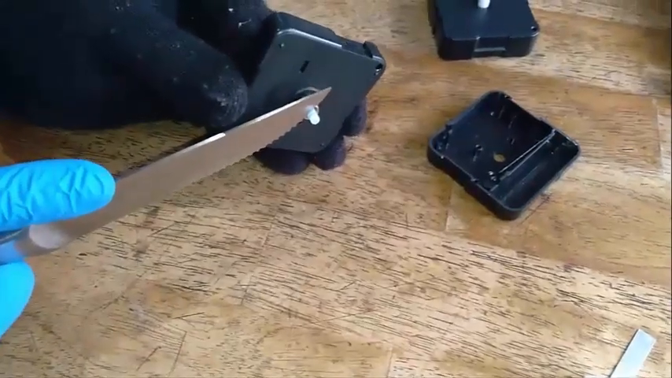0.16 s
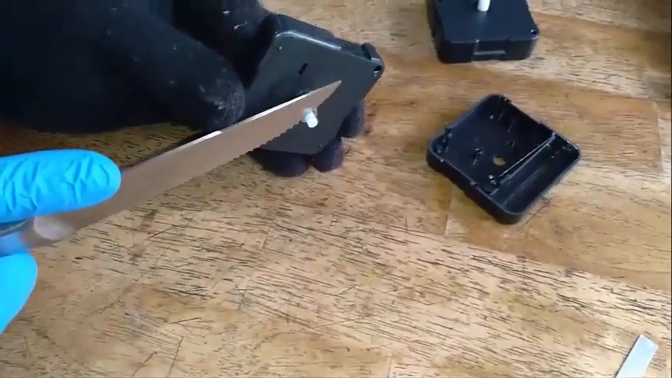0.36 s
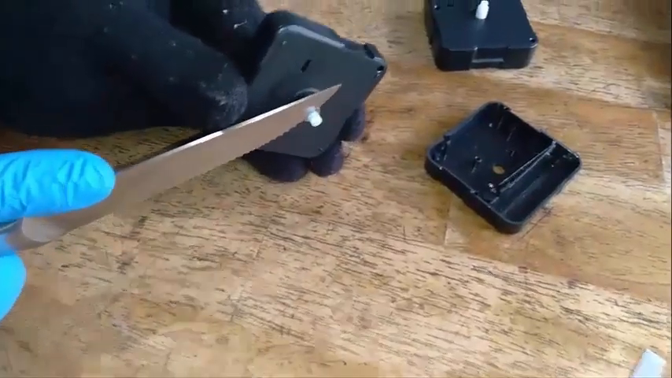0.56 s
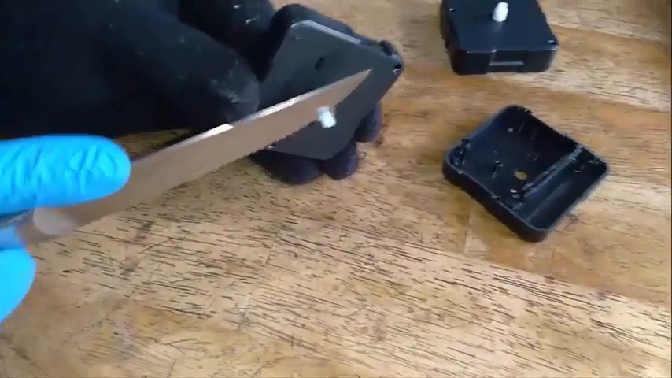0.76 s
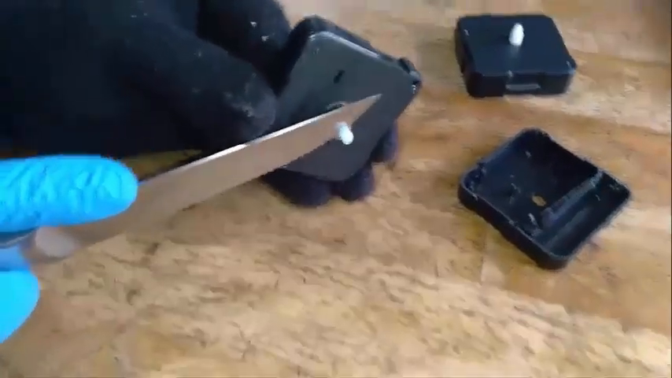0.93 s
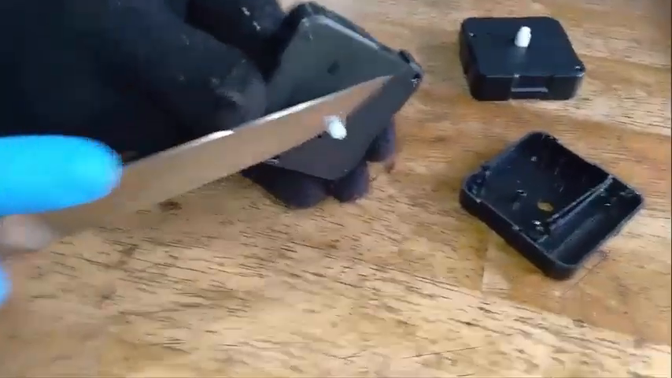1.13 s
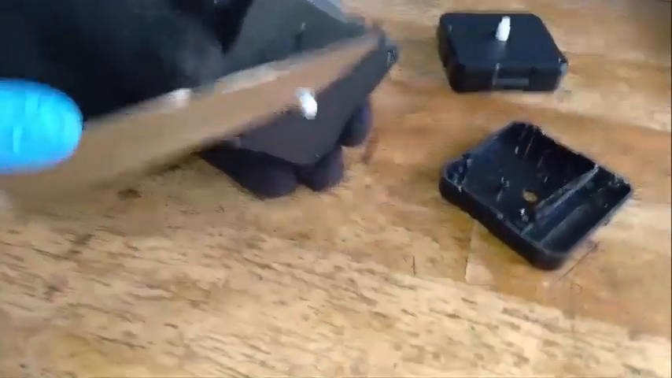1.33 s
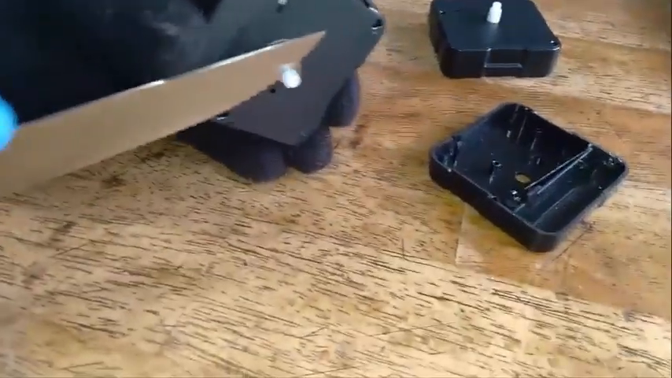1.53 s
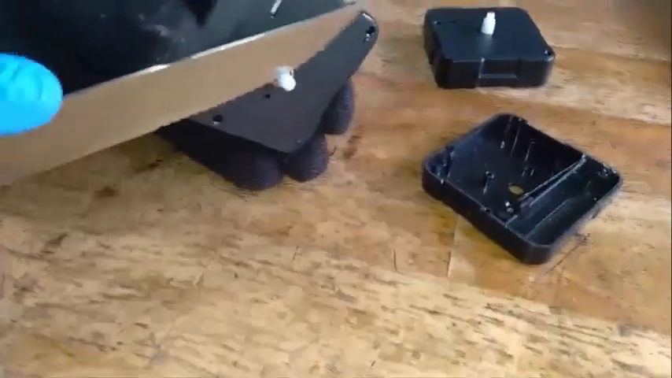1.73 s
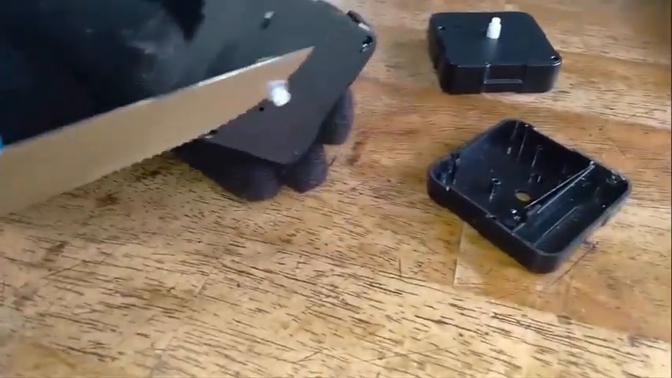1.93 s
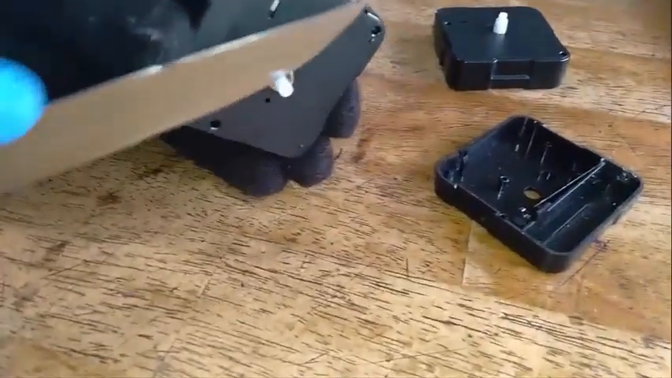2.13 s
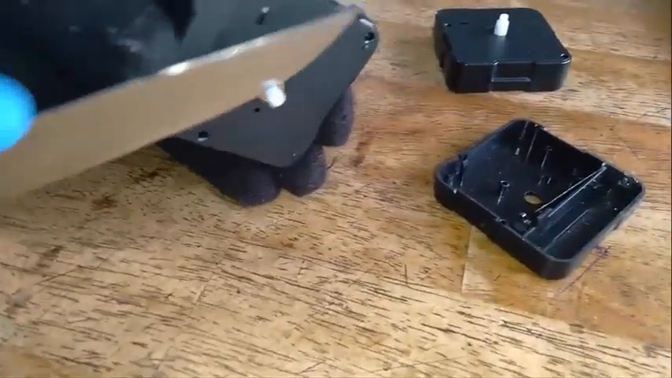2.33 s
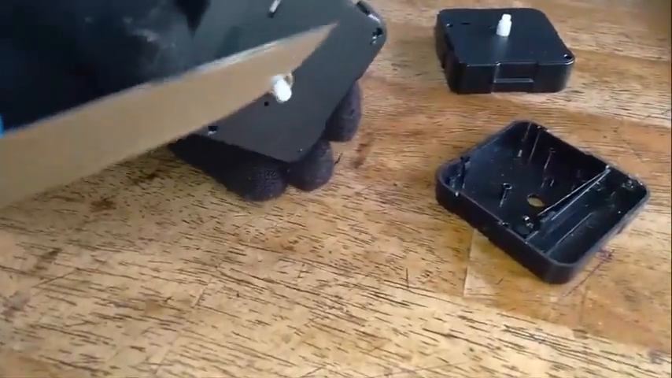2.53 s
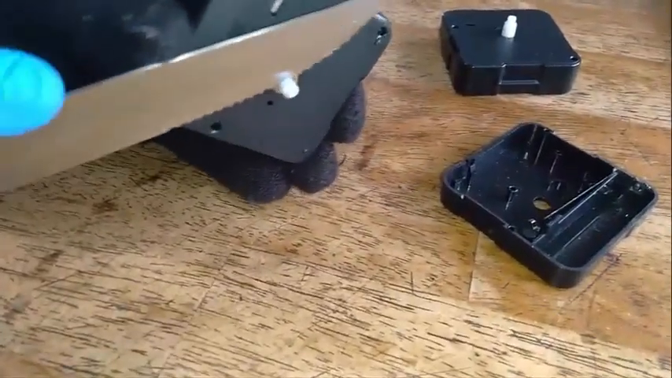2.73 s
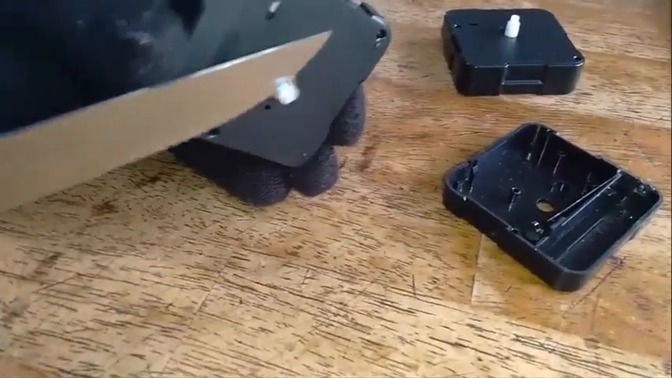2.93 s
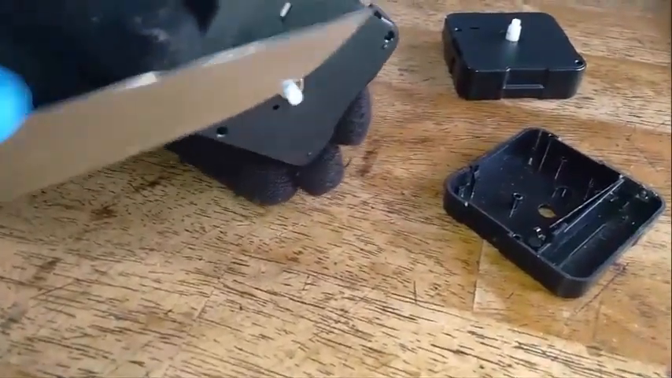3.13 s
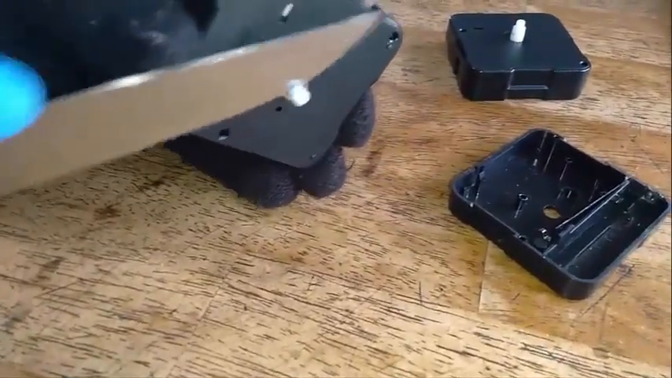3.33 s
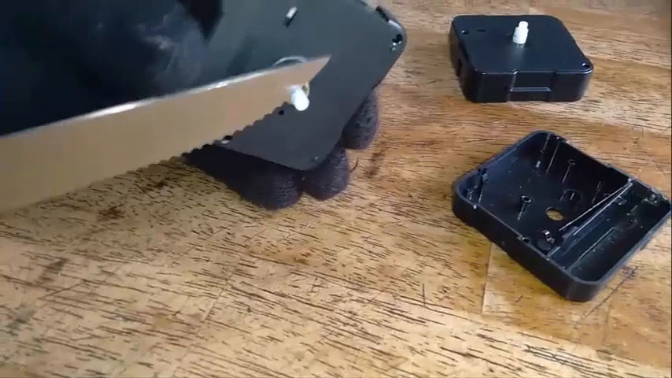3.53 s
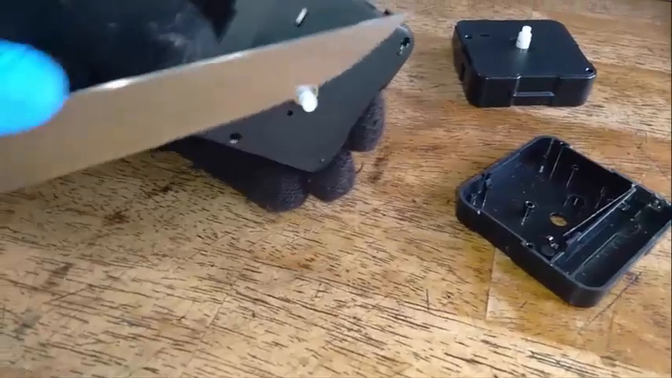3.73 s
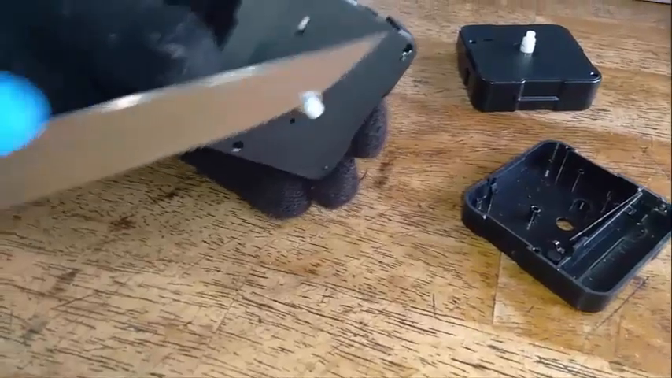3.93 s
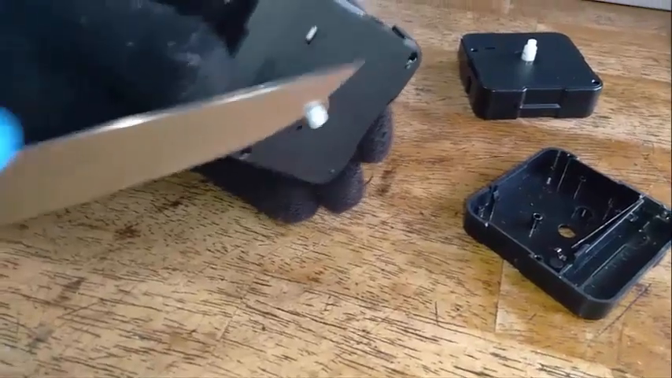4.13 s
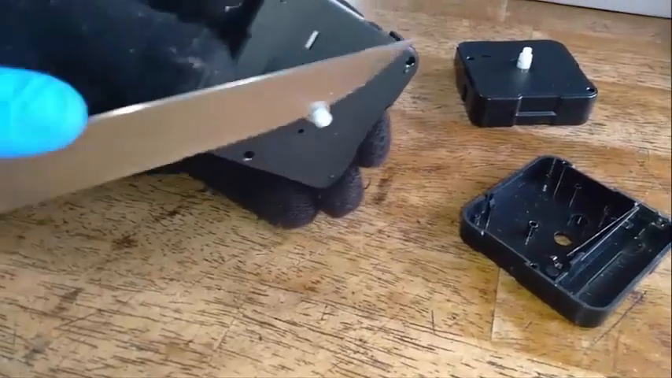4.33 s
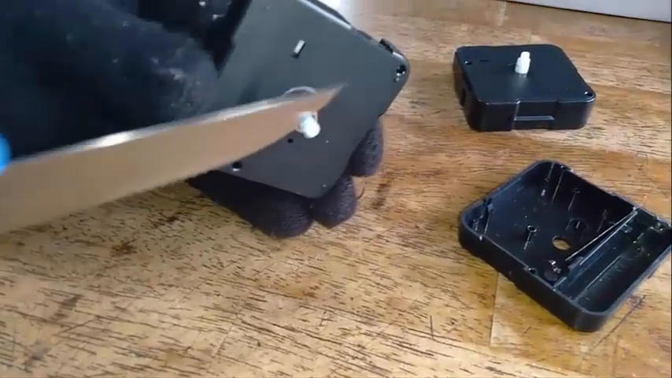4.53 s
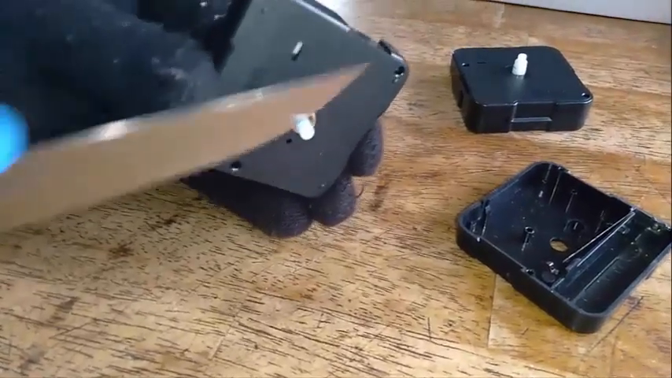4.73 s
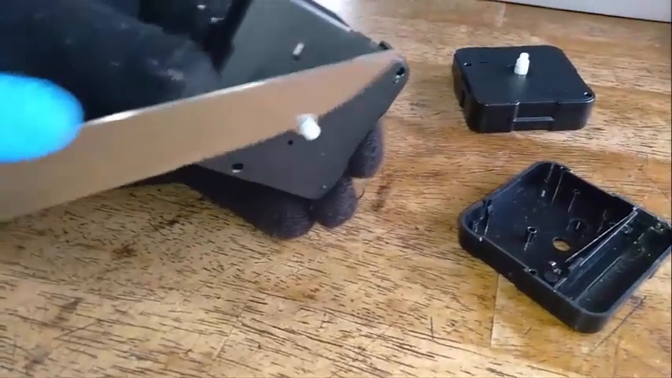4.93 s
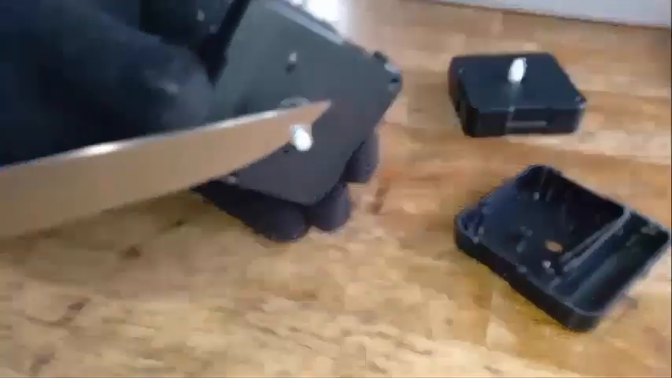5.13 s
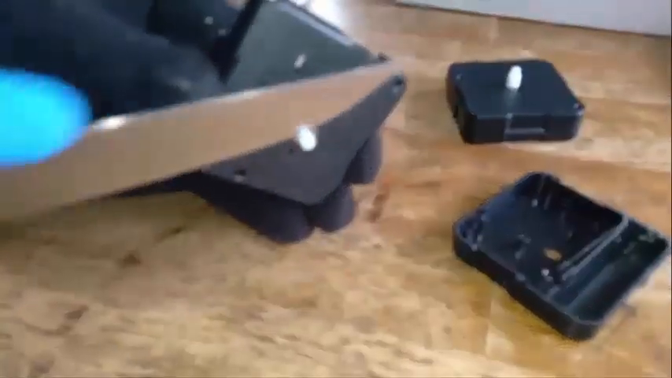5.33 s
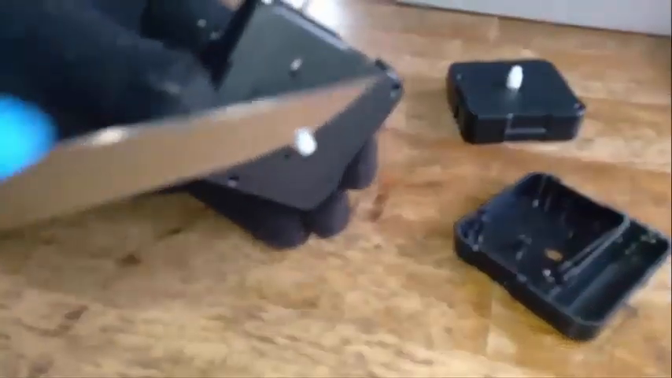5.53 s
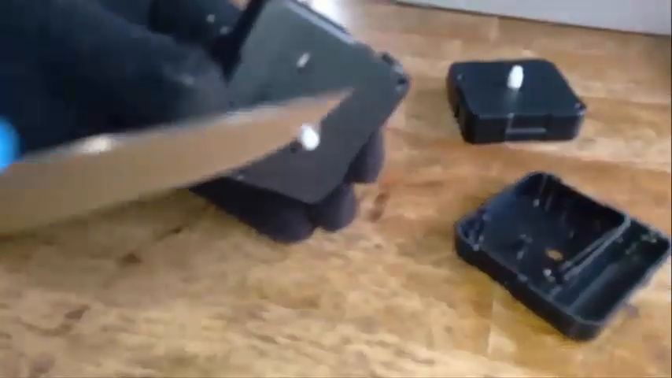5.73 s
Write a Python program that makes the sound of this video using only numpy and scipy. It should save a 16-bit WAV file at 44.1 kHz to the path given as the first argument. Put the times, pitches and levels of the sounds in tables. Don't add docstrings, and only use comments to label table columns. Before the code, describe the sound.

Close stereo pickup in a small indoor room. After near silence with tiny glove ticks, a serrated knife begins sawing a thin plastic shaft. Short runs of separate tooth clicks alternate, louder going out and weaker, raspier coming back, about three full cycles per second. The steel rings brightly, the hollow plastic case knocks dully, and strokes strengthen until the end.

```python
import sys
import numpy as np
from scipy import signal
from scipy.fft import rfft, irfft
from scipy.io import wavfile
from scipy.ndimage import uniform_filter1d, minimum_filter1d

SR = 44100
rng = np.random.default_rng(int(sys.argv[2]) if len(sys.argv) > 2 else 0)


def wrap_up_sound(samples):
    columns = np.atleast_2d(samples).T
    tamed = np.clip(columns, -1, 1)
    steps = np.round(tamed * 32767).astype(np.int16)
    wavfile.write(sys.argv[1], SR, steps)


def nominal_scale(level):
    x = np.asarray(level, float) / 20
    return 10 ** x


N = 254898


def unit(x):
    return x / np.sqrt(np.mean(x ** 2) + 1e-20)


def along(points, hz):
    point_hz, value = np.transpose(points)
    return np.interp(np.log(hz + 1), np.log(point_hz + 1), value)


def level(rows):
    time_s, level_db = np.transpose(rows)
    return nominal_scale(np.interp(np.arange(N) / SR, time_s, level_db))


def coloured(x, spectrum):
    points = [(1, -90)] + list(spectrum) + [(SR / 2, -90)]
    gain = nominal_scale(along(points, np.fft.rfftfreq(4096, 1 / SR)))
    cepstrum = irfft(np.log(gain))
    cepstrum[1:2048] *= 2
    cepstrum[2049:] = 0
    pulse = irfft(np.exp(rfft(cepstrum)))
    pulse = pulse / np.linalg.norm(pulse)
    return signal.fftconvolve(x, pulse[None], axes=1)[:, :N]


def grit(alike, spiky_db, lag=10):
    shared, left, right = rng.standard_normal((3, N))
    grains = nominal_scale(spiky_db * unit(uniform_filter1d(rng.standard_normal(N), size=24)))
    mix = np.clip(alike, 0, 1)
    common = np.array([shared, np.roll(shared, -int(lag))])
    own = np.array([left, right])
    return unit((np.sqrt(mix) * common + np.sqrt(1 - mix) * own) * grains)


def patches(shape, bins, frames):
    field = uniform_filter1d(rng.standard_normal(shape), size=bins, axis=0)
    return unit(uniform_filter1d(field, size=frames, axis=1))


def mottled(x, depth_db, frames):
    z = signal.stft(x, SR, nperseg=256)[2]
    field = patches(z.shape[1:], bins=6, frames=frames)
    return signal.istft(z * nominal_scale(depth_db * field), SR, nperseg=256)[1][:, :N]


# multiple, level_db
DRONE_HARMONICS = [(1, -17), (2, 2), (3, -3), (4, -4.5), (5, -3.5), (6, -4.5), (7, -12), (8, -3.5),
                   (9, -19), (10, -14), (11, -14), (12, -28), (13, -19), (14, -17.5)]
# freq_hz, density_db
AIR_SPECTRUM = [(300, -4), (700, 10), (3000, -17), (8200, -6), (10000, -17), (12000, -34)]


def background():
    drone_hz = 30.41
    t = np.arange(N) / SR
    phases = 2 * np.pi * rng.random(len(DRONE_HARMONICS))
    drone = np.zeros(N)
    for (multiple, level_db), phase in zip(DRONE_HARMONICS, phases):
        drone += nominal_scale(level_db) * np.sin(2 * np.pi * drone_hz * multiple * t + phase)
    air = coloured(rng.standard_normal((2, N)), AIR_SPECTRUM)
    return nominal_scale(-89.0) * drone + nominal_scale(-106) * air


# freq_hz, t60_s
ROOM_DECAY = [(200, 0.27), (8000, 0.15), (15000, 0.14)]


def room(x):
    wet, step, delay = np.zeros((2, N + SR)), SR // 6, 620
    for start in range(0, N, step):
        hz, t, z = signal.stft(rng.standard_normal((2, SR // 3)), SR, nperseg=256)
        decay = nominal_scale(-60 * t / along(ROOM_DECAY, hz)[:, None])
        tail = signal.istft(z * decay, SR, nperseg=256)[1]
        part = signal.fftconvolve(x[:, start:start + step], tail / np.linalg.norm(tail[0]), axes=1)
        wet[:, start + delay:][:, :part.shape[1]] += part
    return wet[:, :N]


# start_s, peak_db
GLOVE_TICKS = [
    (0.151, -74),
    (0.6174, -70),
]


def creaks():
    force, t = np.zeros(N), np.arange(300) / SR
    for start_s, peak_db in GLOVE_TICKS:
        force[round(start_s * SR):][:len(t)] = nominal_scale(peak_db - 5 - 60 * t / .012)
    return coloured(force * grit(0.46, 2.0), [(4500, -30), (8000, -13), (10500, -10), (12000, -34)])


# time_s, level_db
DRAG_LEVEL = [
    (1.2, -110),
    (1.28, -80),
    (1.31, -71),
    (1.35, -76),
    (1.4, -102),
    (1.46, -67),
    (1.5, -62.5),
    (1.54, -75),
    (1.62, -110),
]


def glove_drag():
    hum_spectrum = [(300, -17), (1270, -13.5), (1540, 3), (1910, -5), (5500, -19)]
    return coloured(level(DRAG_LEVEL) * grit(.4, 1.9), hum_spectrum)


# time_s, level_db
RUB_LEVEL = [(.39, -100), (.47, -100), (.51, -53), (.55, -69), (.8, -88), (.93, -58.5), (.97, -68.5),
             (1.17, -96), (1.195, -54), (1.3, -70), (1.44, -76), (1.53, -55), (1.62, -64.5), (1.87, -65),
             (2.19, -61), (3.6, -68), (4.14, -61.5), (5.78, -62.5)]
# freq_hz, density_db
RUB_SPECTRUM = [(150, -30), (600, -17), (1500, -16), (3000, -13), (4800, -6), (7800, -2), (10000, 0),
                (12000, -8), (16000, -14)]


def blade_rub():
    lift_db, lead_s = -11, 0.0097
    turns = [(run[0] - lead_s, lift_db) for run in PUSH_RUNS]
    turns += [(run[0] - lead_s, 0) for run in PULL_RUNS]
    return coloured(level(RUB_LEVEL) * level(sorted(turns)) * grit(0.021, 1.2), RUB_SPECTRUM)


def stroke(runs, counts, lone, contact_ms, rasp_db, rasp_per_db):
    first, last, first_db, last_db, slowing = np.repeat(runs, counts, axis=0).T
    u = np.concatenate([np.linspace(0, 1, n) for n in counts])
    ease = 0.11 * np.sin(2 * np.pi * u) / (2 * np.pi)
    s = first + (last - first) * (u + slowing * u * (u - 1) + ease)
    luck = rng.standard_normal((len(u) + len(lone), 3))
    bite = luck[:len(u), 0]
    arch_db = 1 * (np.sin(np.pi * u) - .4)
    db = first_db + (last_db - first_db) * u + 1.5 * bite + arch_db
    deepening = 0.065 * (s - 4.1)
    ms = np.interp(u, [0, .5, 1], contact_ms) * np.exp(deepening - 0.28 * bite + 0.17 * luck[:len(u), 1])
    s, db, ms = np.hstack([[s, db, ms], np.transpose(lone)])
    rasp_db = rasp_db - rasp_per_db * (db + 25.5)
    rasp_db = rasp_db + 2.27 * luck[:, 2] - 1.8 * np.pad(bite, (0, len(lone)))
    return np.array([s, db, ms, rasp_db]).T


# first_s, last_s, first_db, last_db, slowing (-1..1)
PUSH_RUNS = [(.412, .4487, -37.5, -35.5, 0), (0.685, 0.748, -29.5, -35.5, 0.43),
             (1.0317, 1.0674, -31, -35.5, -0.054), (1.3571, 1.3981, -31.5, -27.5, -0.41),
             (1.7074, 1.7597, -30.5, -27.5, 0.11), (2.053, 2.1075, -28, -22.5, -0.12),
             (2.386, 2.4603, -24, -26.5, 0.076), (2.73, 2.779, -25.5, -22.5, 0.037),
             (3.0644, 3.1071, -20, -27, 0.3), (3.3544, 3.4104, -21.5, -25.5, 0.059),
             (3.6828, 3.7448, -22.5, -26.5, 0.188), (4.007, 4.05, -20, -23, .03),
             (4.3227, 4.3693, -24, -22.5, 0.044), (4.6422, 4.701, -22.5, -24.5, 0.36),
             (4.9595, 5.0114, -23, -23.5, 0.03), (5.2695, 5.3253, -22, -23.5, -0.051),
             (5.591, 5.6618, -24, -23.5, 0.064)]
PUSH_COUNTS = [2, 3, 3, 3, 5, 5, 7, 5, 4, 5, 6, 5, 5, 6, 6, 7, 8]
# start_s, level_db, contact_ms
PUSH_LONE = [(0.5196, -59, 4.6), (0.529, -53, 6), (1.0994, -41.5, 11.4), (1.4407, -38, 1.5),
             (1.4435, -44.5, 8.9), (2.1382, -27, 3.6), (2.4908, -43, 3.3), (2.7972, -26.5, 3.8),
             (3.4318, -27.5, 3.4), (3.7618, -24, 4.7), (4.0689, -24, 5.8), (4.6258, -27, 3.5),
             (5.0297, -26, 3.3), (5.3394, -19, 2.8), (5.6819, -20.5, 2)]


def push_stroke():
    return stroke(PUSH_RUNS, PUSH_COUNTS, PUSH_LONE,
                  contact_ms=(2.5, 5, 4.5), rasp_db=-6.5, rasp_per_db=0.1377)


# first_s, last_s, first_db, last_db, slowing (-1..1)
PULL_RUNS = [(0.8572, 0.8787, -35, -38.5, 0), (1.1991, 1.2233, -34, -34.5, 0),
             (1.5274, 1.5792, -29, -31, 0.11), (1.8844, 1.93, -28, -31, -0.04),
             (2.222, 2.2704, -26.5, -30, 0.16), (2.545, 2.6059, -30, -30, 0.042),
             (2.882, 2.9373, -27, -27.5, -0.12), (3.2346, 3.259, -24, -29.5, 0.023),
             (3.529, 3.568, -33, -30.5, -0.046), (3.858, 3.895, -30, -32.5, 0.011),
             (4.1567, 4.2042, -30.5, -28, 0.021), (4.4751, 4.5113, -27.5, -30.5, -0.17),
             (4.7972, 4.855, -26.5, -32, 0.023), (5.1086, 5.121, -37, -35.5, 0),
             (5.1322, 5.153, -24.5, -30.5, -0.074), (5.4433, 5.4878, -26, -32, 0.095),
             (5.7603, 5.7718, -27, -27, 0)]
PULL_COUNTS = [2, 2, 4, 4, 4, 6, 5, 3, 4, 4, 5, 4, 6, 2, 3, 6, 2]
# start_s, level_db, contact_ms
PULL_LONE = [(.843, -45.5, 1.8), (.869, -50, 6.2), (.899, -47.5, 11), (1.208, -47, 12), (1.253, -46.5, 2.1),
             (1.602, -46, 4.4), (1.6093, -47, 3.3), (1.8531, -40.5, 1.5), (1.944, -45.5, 17.5),
             (1.996, -52, 1.2), (2.2, -45.5, 1.1), (2.2953, -41, 1.7), (2.3022, -48, 2.4),
             (2.526, -33.5, 5.2), (2.629, -43.5, 6.5), (2.958, -32, 2.2), (3.2201, -41, 6.3),
             (3.2707, -38, 8.9), (3.5804, -45.5, 14.6), (3.841, -35, 6.8), (4.2163, -38.5, 12.3),
             (4.448, -38.5, 1.8), (4.5207, -37, 15), (4.535, -40.5, 17), (5.1664, -33, 2.1),
             (5.4315, -35, 1.9), (5.5004, -34, 2.5)]
# start_s, level_db, contact_ms
GRAZES = [(.955, -67.5, 15), (1.2628, -54, 4.8), (2.8666, -63, 5.1), (3.3289, -51.5, 3), (3.606, -58.5, 12),
          (3.6404, -64, 2.3), (3.9164, -50.5, 11), (4.2826, -65, 3.7), (4.289, -68, 2.3),
          (4.9174, -61.5, 8), (5.1757, -51.5, 22), (5.511, -57, 12)]


def pull_stroke():
    return stroke(PULL_RUNS, PULL_COUNTS, PULL_LONE + GRAZES,
                  contact_ms=(2.5, 4, 4), rasp_db=-5.5, rasp_per_db=0.31)


def contacts(rows, db, rise_ms, fall_ms, creep_db=-23, snap_db=5.0):
    start_s, hold_ms = np.array(rows)[:, 0], np.array(rows)[:, 2, None]
    ms = np.arange(-420, 1000) * 1000 / SR
    bite = 1 / (1 + np.exp(-np.clip(ms / rise_ms, -50, 50)))
    creep = nominal_scale(creep_db) * np.exp(-(np.minimum(ms, 0) / 5.63) ** 2)
    sag_db = -6 * np.clip(ms / hold_ms, 0, 1)
    release_db = -9 * np.maximum(ms - 0.87 * hold_ms, 0) / fall_ms
    clear_db = -0.54 * np.maximum(ms - hold_ms - 5.5, 0) ** 2
    land_db = -1.1 * np.maximum(-ms - 4.5, 0) ** 2
    snap = nominal_scale(snap_db * (np.exp(-np.abs(ms - .3) / 0.53) - 0.32))
    shape = np.maximum(bite * snap, creep) * nominal_scale(sag_db + release_db + clear_db + land_db)
    shape = nominal_scale(db)[:, None] * shape
    where = np.round(start_s * SR).astype(int)[:, None] + np.arange(-400, 1020)
    return np.sqrt(np.bincount(where.ravel(), shape.ravel() ** 2, N + SR)[:N])


def ring(force, times, modes, scatter_db):
    luck = nominal_scale(scatter_db * rng.standard_normal((len(times), len(modes), 2)))
    tooth = np.clip(np.searchsorted(times - .001, np.arange(N) / SR) - 1, 0, None)
    out = np.zeros((2, N))
    for k, (hz, width_hz, db) in enumerate(modes):
        b, a = signal.iirpeak(hz, hz / width_hz, SR)
        mode = signal.lfilter(b, a, force * luck[tooth, k].T)
        out += nominal_scale(db) * mode * np.sqrt(SR / (np.pi * width_hz))
    return out


# freq_hz, density_db
KNOCK_SPECTRUM = [(15, -6), (30, -7), (350, -4), (800, -3.5), (1400, -6.5), (2400, -6.5)]


def case_knock(rows):
    s, db = rows[:, 0], rows[:, 1]
    knock_db = db - 22.5 + 0.5 * s + 1.1 * rng.standard_normal(len(s))
    return coloured(contacts(rows, knock_db, 0.15, 1.45) * grit(0.2, 1.9, lag=0), KNOCK_SPECTRUM)


# freq_hz, width_hz, level_db
CASE_MODES = [(632, 114, -24), (1030, 580, -16.5), (2140, 490, -17), (2860, 610, -18.5), (5340, 1140, -5),
              (5910, 400, -19.5), (6060, 640, -10.5)]


def case_ring(rows):
    s, db, _, rasp_db = rows.T
    force = contacts(rows, db + rasp_db - 4.0, 0.32, 2.65)
    return ring(force * grit(0.23, 1.5), np.sort(s), CASE_MODES, scatter_db=4.5)


# freq_hz, density_db
PUSH_RASP = [(900, -17), (1600, -6.5), (2150, -4.5), (3050, -5.5), (5800, 3), (7100, 2), (9000, -20)]
# freq_hz, density_db
PULL_RASP = [(900, -16.5), (1600, -7.5), (2150, -14), (3350, -10), (4200, -4.5), (4800, 2), (7300, -15.5),
             (9000, -20)]


def shaft_rasp(push, pull):
    out = np.zeros((2, N))
    for rows, spectrum in [(push, PUSH_RASP), (pull, PULL_RASP)]:
        _, db, _, rasp_db = rows.T
        out += coloured(contacts(rows, db + rasp_db - 6.5, 0.64, 6.1) * grit(0.1, 2.8), spectrum)
    return out


# freq_hz, width_hz, level_db
BLADE_MODES = [(8070, 280, -2), (8460, 190, -5.5), (8650, 140, -12), (9853, 280, -2.5), (10210, 530, -1.5),
               (10400, 750, -3.5), (12580, 330, -16.5), (14400, 290, -9)]


def blade_ring(rows):
    s, db = rows[:, 0], rows[:, 1]
    force = contacts(rows, db - 10.5, 0.019, 3.13)
    return ring(force * grit(.75, 2, lag=9), np.sort(s), BLADE_MODES, scatter_db=3)


# freq_hz, density_db
EDGE_SPECTRUM = [(5000, -5), (7500, 2), (10000, 4), (12000, 1.5), (15500, -4.5), (16500, 6.5)]


def edge_hiss(rows):
    return coloured(contacts(rows, rows[:, 1] - 4.5, 0.026, 4.5) * grit(0.089, 4.3), EDGE_SPECTRUM)


# time_s, left_over_right_db
PORT_BALANCE = [(.4, 1.5), (1.5, 1.3), (2.4, 0), (4.2, 1.2), (5.78, -.6)]


def teeth():
    push, pull = push_stroke(), pull_stroke()
    rows = np.vstack([push, pull])
    steel = edge_hiss(rows) + blade_ring(rows)
    plastic = shaft_rasp(push, pull) + case_ring(rows) + case_knock(rows)
    lean = np.sqrt(level(PORT_BALANCE))
    return (steel + plastic * nominal_scale([[.9], [-.9]])) * [lean, 1 / lean]


def scene():
    knife = mottled(teeth(), depth_db=2.5, frames=3)
    haze = nominal_scale(-20.5) * room(knife) + blade_rub() + glove_drag()
    return knife + mottled(haze, depth_db=3.0, frames=14) + creaks() + background()


def masked(x, margin_db, faint_db):
    hz, _, z = signal.stft(x, SR, nperseg=256)
    local_db = 10 * np.log10(np.abs(uniform_filter1d(np.abs(z) ** 2, size=9, axis=1)) + 1e-20)
    nearby_db = -minimum_filter1d(-local_db, size=9, axis=2)
    steady_db = uniform_filter1d(local_db, size=8, axis=2)
    blots, streaks = patches(z.shape[1:], 11, 3), patches(z.shape[1:], 4, 14)
    beside = np.clip((nearby_db - local_db - margin_db + 5 * blots) / 2, 0, 1) * (hz > 500)[:, None]
    faint = np.clip((faint_db - steady_db + 5 * streaks) / 2, 0, 1) * (hz > 12000)[:, None]
    return signal.istft(z * nominal_scale(-24 * np.maximum(beside, faint)), SR, nperseg=256)[1][:, :N]


def top_cut(x):
    return signal.sosfilt(signal.butter(12, 16990, fs=SR, output="sos"), x)


# freq_hz, gain_db
MIC_RESPONSE = [(20, 0), (15600, 0), (16000, -26), (17000, -42)]


def record(dry):
    rounded = dry / (1 + np.abs(dry / 0.11) ** 3) ** (1 / 3)
    response = nominal_scale(along(MIC_RESPONSE, np.fft.rfftfreq(N, 1 / SR)))
    band = irfft(rfft(rounded) * response, N)
    kept = masked(band, margin_db=25.5, faint_db=-91)
    return top_cut(kept)


dry = scene()
out = record(dry)
wrap_up_sound(out)
```